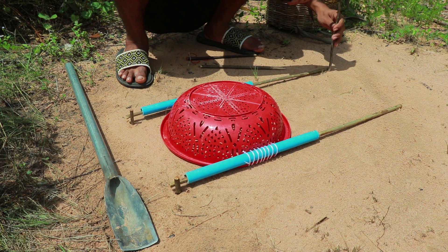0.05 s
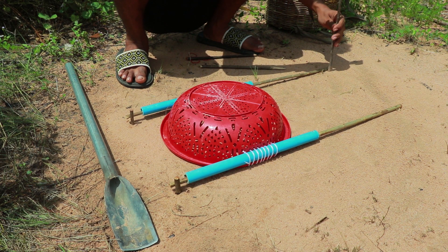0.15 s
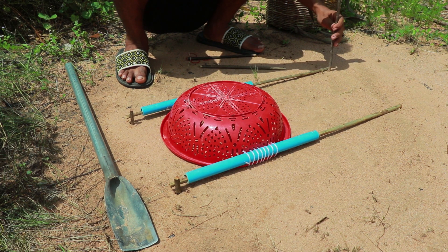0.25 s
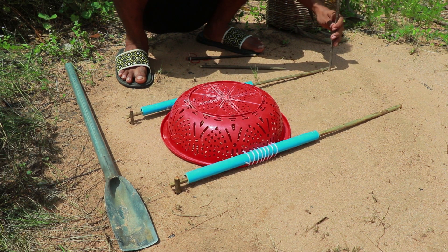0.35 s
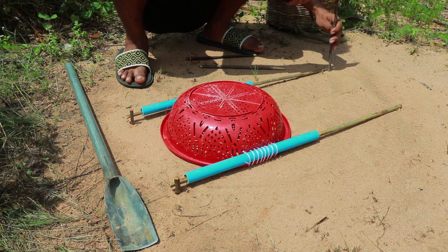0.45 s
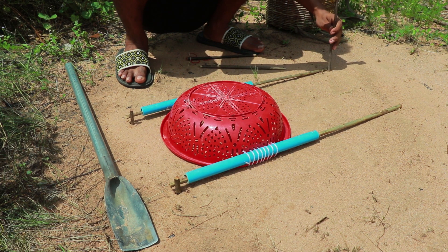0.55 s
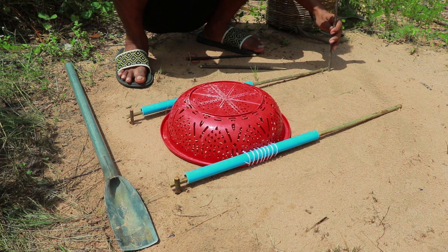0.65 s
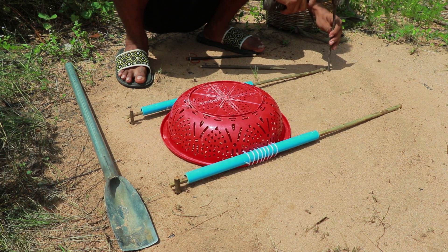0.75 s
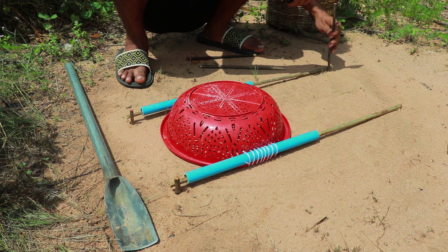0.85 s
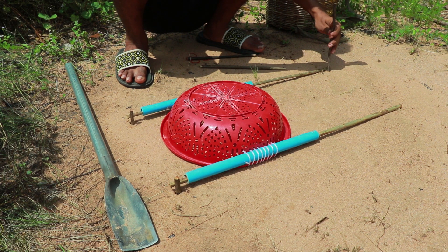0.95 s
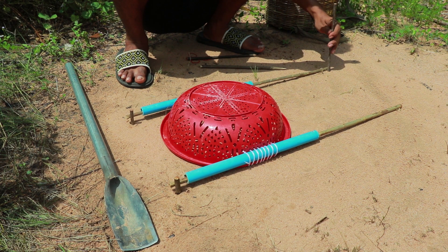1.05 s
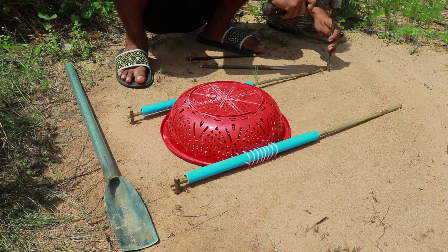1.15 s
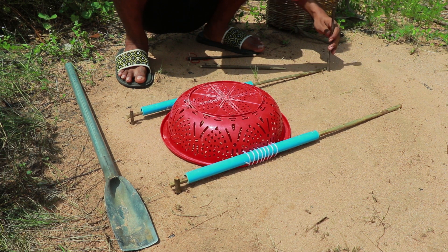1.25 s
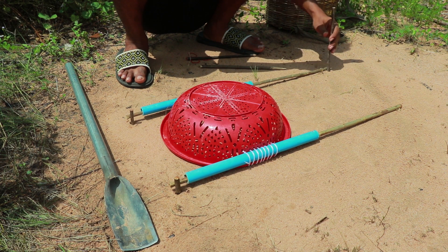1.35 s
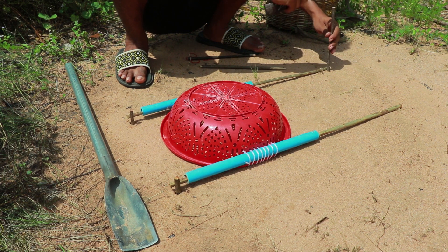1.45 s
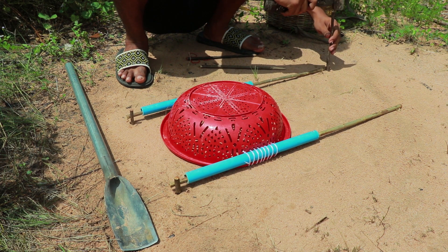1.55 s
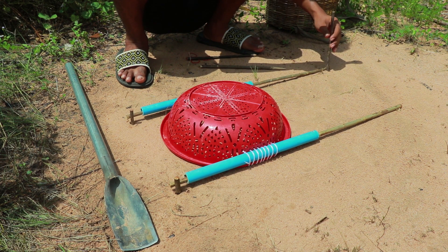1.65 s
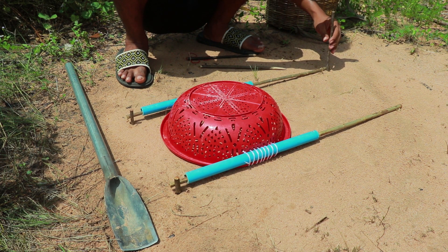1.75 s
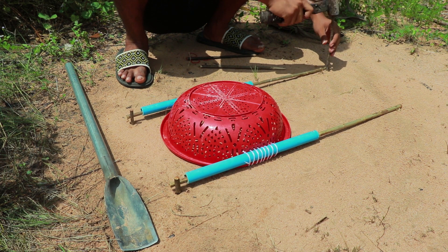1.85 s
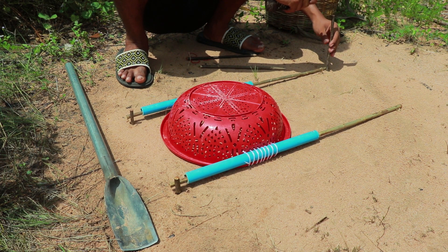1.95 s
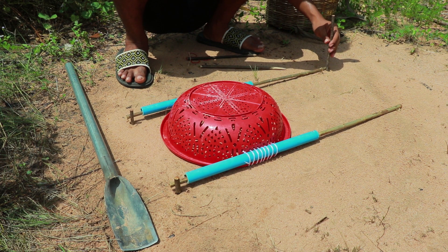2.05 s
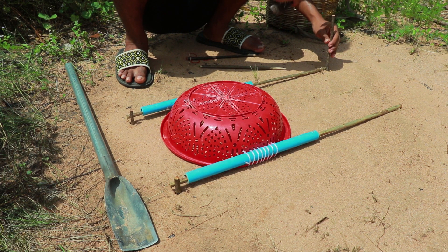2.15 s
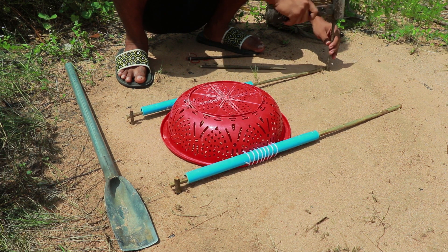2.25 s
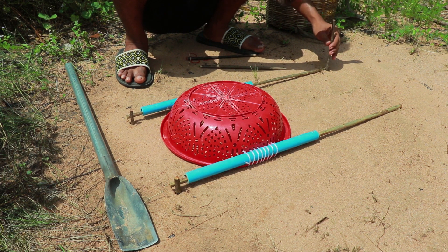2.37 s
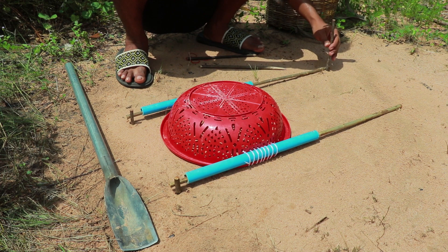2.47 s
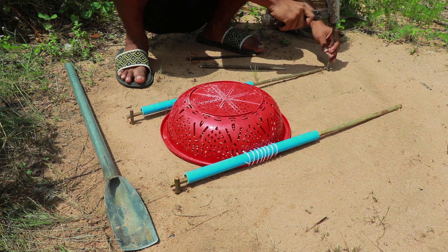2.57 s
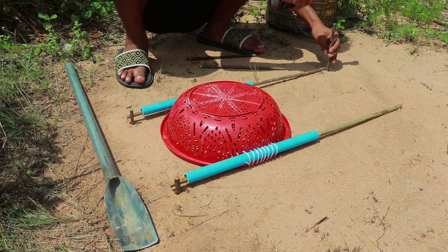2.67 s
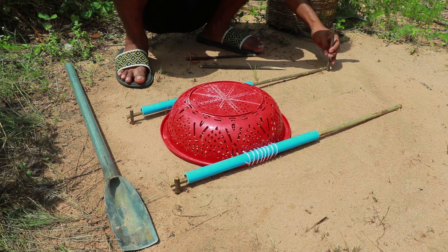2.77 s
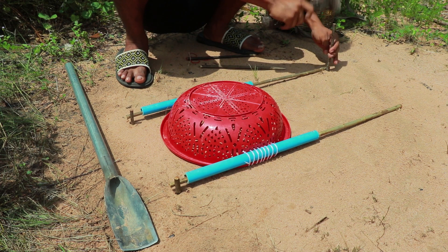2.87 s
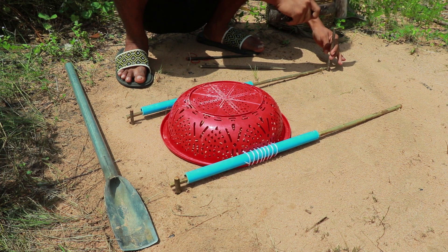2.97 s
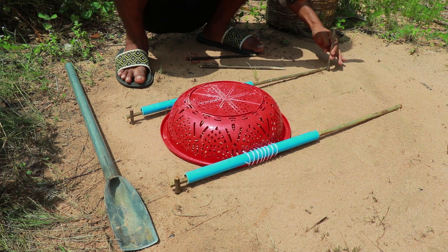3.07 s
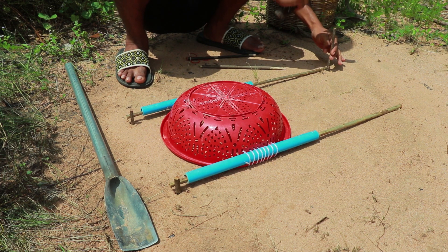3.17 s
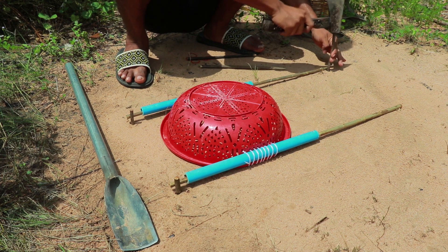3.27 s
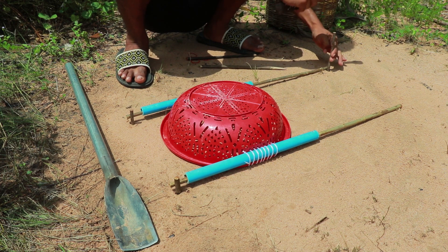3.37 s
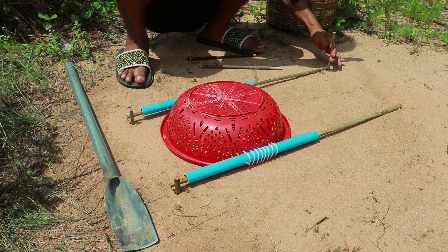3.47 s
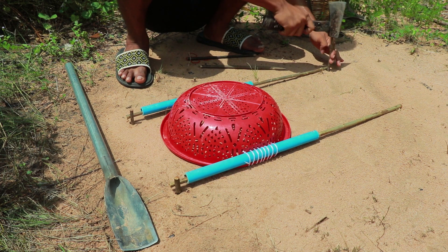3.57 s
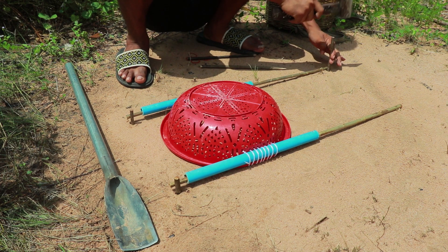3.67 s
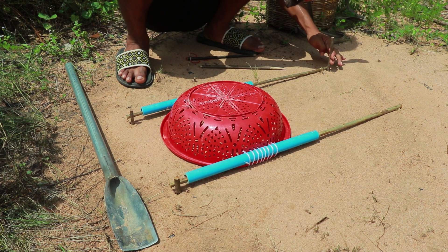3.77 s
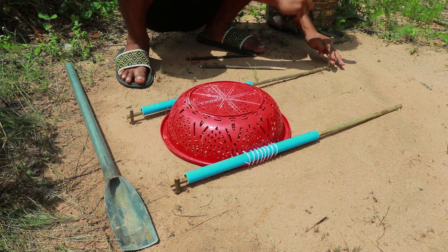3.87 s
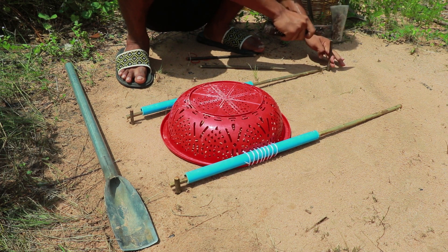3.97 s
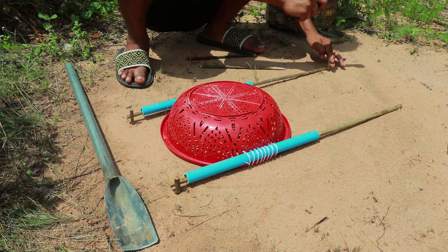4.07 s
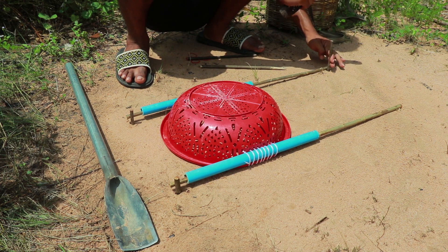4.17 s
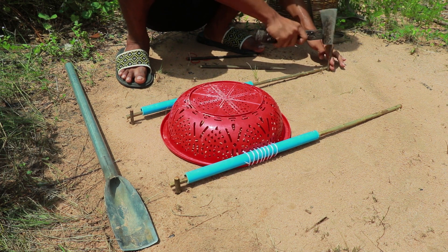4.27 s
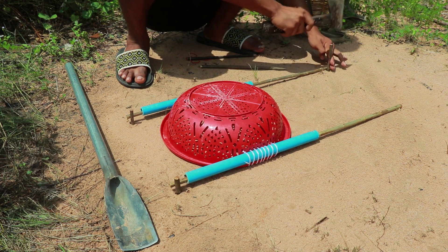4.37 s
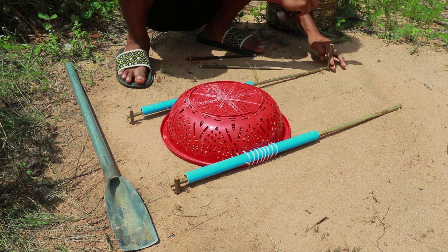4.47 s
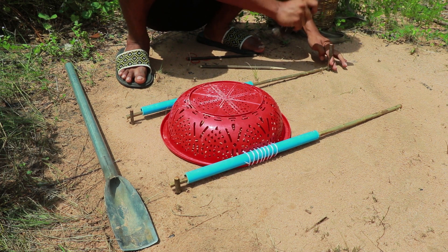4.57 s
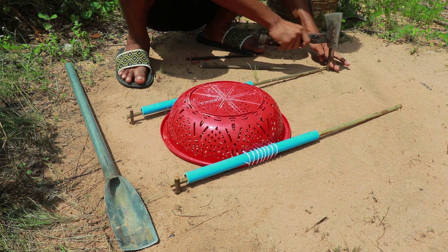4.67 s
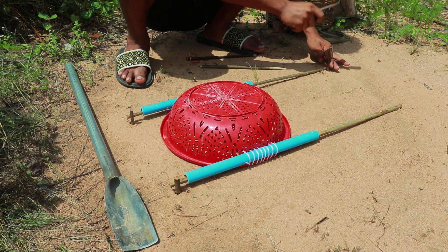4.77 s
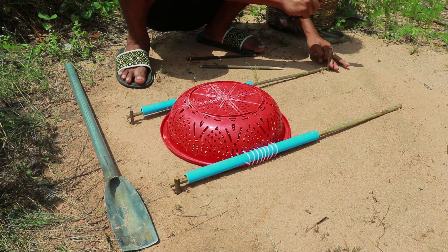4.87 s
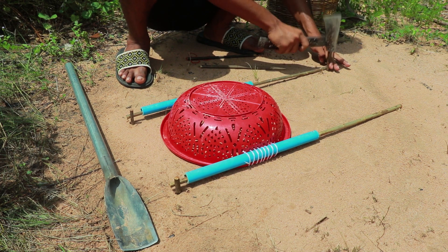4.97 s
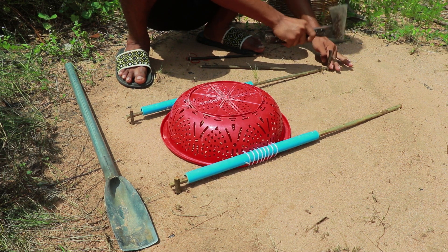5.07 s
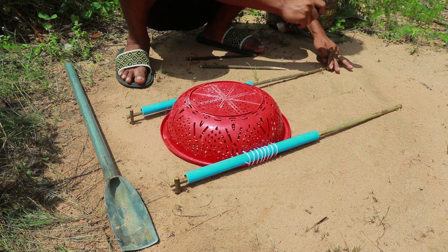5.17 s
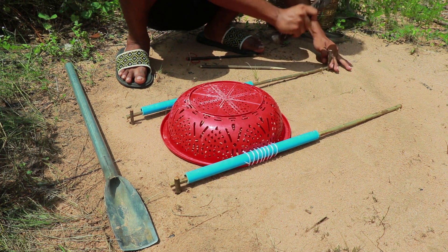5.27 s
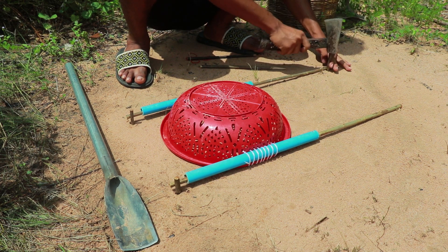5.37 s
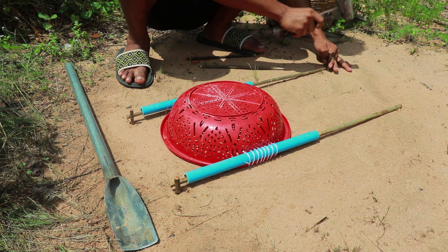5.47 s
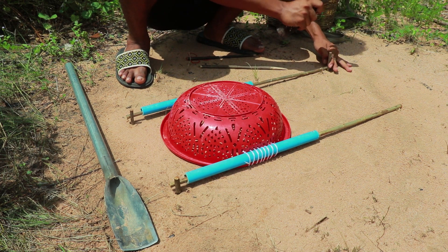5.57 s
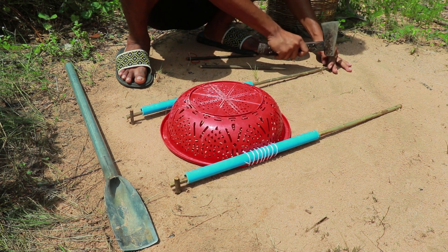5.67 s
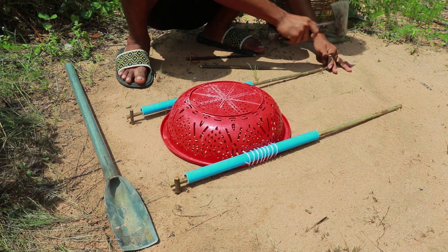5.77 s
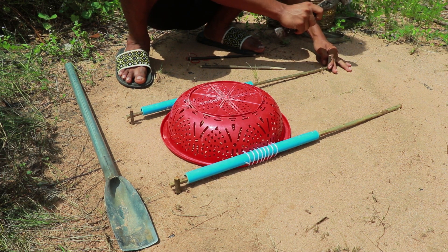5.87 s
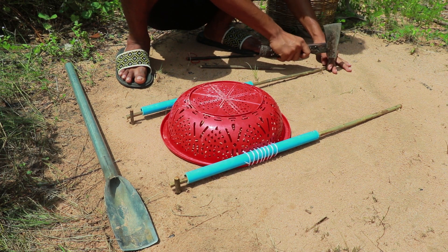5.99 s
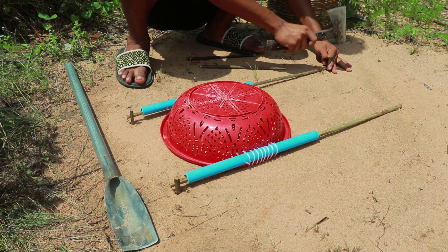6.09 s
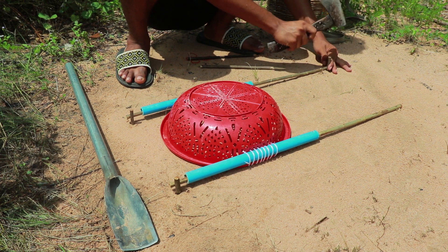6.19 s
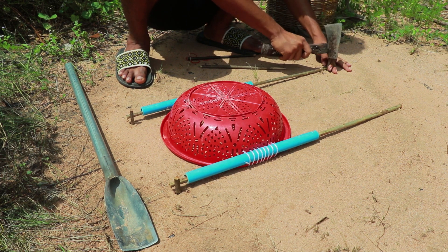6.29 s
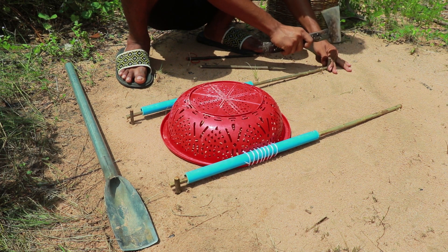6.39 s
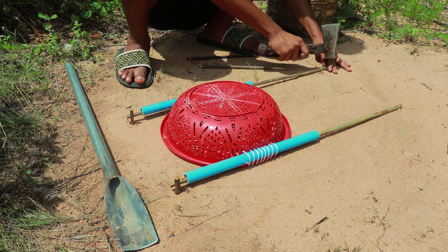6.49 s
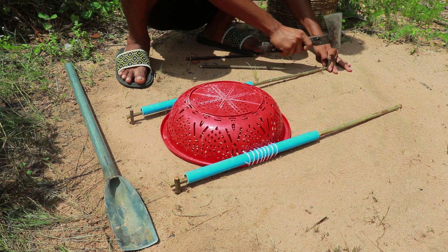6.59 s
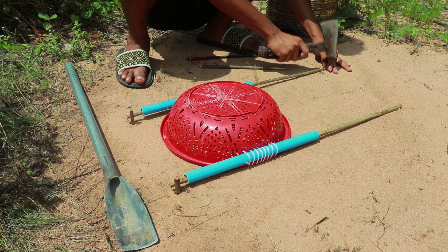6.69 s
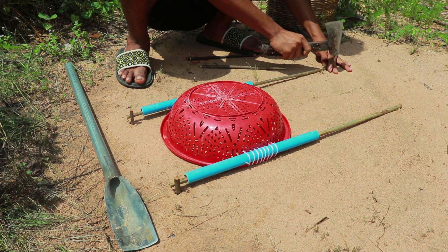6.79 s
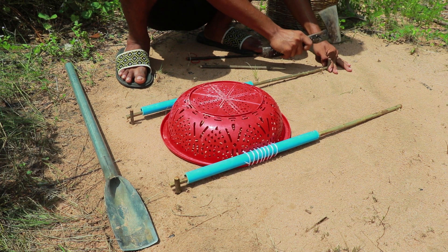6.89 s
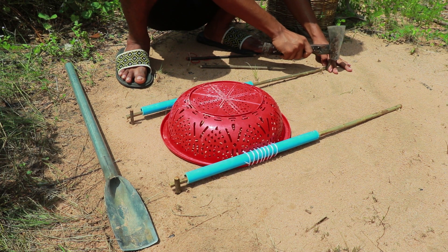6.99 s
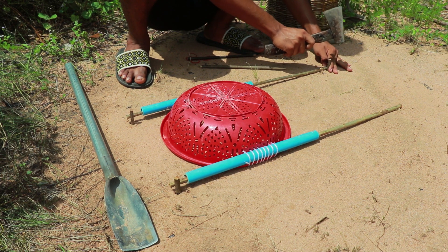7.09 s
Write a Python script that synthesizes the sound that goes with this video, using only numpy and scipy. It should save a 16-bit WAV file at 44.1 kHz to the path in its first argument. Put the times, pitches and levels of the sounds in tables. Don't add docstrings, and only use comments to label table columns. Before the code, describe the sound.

Open air over sandy ground, heard close in stereo, dry, with a quiet hiss, faint high insect bands and soft low puffs of wind. A hatchet held flat hits a thin wooden stake, stronger on the right. From 0.1 s come modest taps about every 0.37 s, brightening until about 1.6 s. Around 1.9 to 2.3 s the cracks are loudest, steely and almost overloaded. Firm, even blows follow at about 0.35 s spacing until 6 s, gradually less metallic, the soil thud and rumble fuller. Each is a very short chatter with a clipped ring, a fading hiss of shaken grains and a low thump just after; some have a tiny bounce click. From 6.35 to 7.03 s four lighter taps come quicker, about 0.22 s apart, with a brief hollow hum near 480 Hz. Faint husky chirps and short falling whistles from far birds are scattered throughout.

```python
import sys
import numpy as np
from scipy import signal
from scipy.fft import rfft, irfft
from scipy.io import wavfile
from scipy.ndimage import uniform_filter1d

SR = 44100
rng = np.random.default_rng(int(sys.argv[2]) if len(sys.argv) > 2 else 0)


def waveform_to_disk(signal):
    frames = np.transpose(np.atleast_2d(signal))
    scaled = np.clip(frames, -1, 1) * 32767
    samples = np.round(scaled).astype(np.int16)
    wavfile.write(sys.argv[1], SR, samples)


def decibels_to_gain(level_db):
    exponent = np.asarray(level_db, float) / 20
    return 10 ** exponent


N = 314874

# contact_s, stake_db, blade_db, sand_db, thud_db
HATCHET_BLOWS = [(0.1001, -31, -16.5, -24, -43), (0.4828, -27, -18, -24.5, -29), (.841, -25, -15, -22, -20),
                 (1.209, -23.5, -13.5, -19, -23), (1.568, -16.5, -11.5, -17.5, -26),
                 (1.933, -14, -4, -18.5, -20), (2.293, -14, -0.5, -18.5, -20), (2.643, -15, -9, -19.5, -24),
                 (2.9758, -13, -9, -19.5, -19), (3.323, -16.5, -10, -19.5, -20),
                 (3.659, -14.5, -13, -21.5, -17), (4.0154, -15.5, -12, -22.5, -19.5),
                 (4.362, -14.5, -9.5, -22, -15.5), (4.717, -15, -14.5, -21, -17.5),
                 (5.0678, -12, -12, -20.5, -18), (5.421, -14, -15.5, -22, -19),
                 (5.7471, -12, -15.5, -22, -20), (6.0674, -16.5, -13, -23.5, -20.5),
                 (6.3482, -19.5, -24, -27.5, -22), (6.577, -17.5, -23.5, -29, -18.5),
                 (6.796, -22.5, -28.5, -29, -20.5), (7.027, -22.5, -31.5, -28.5, -19.5)]


def unit(x):
    return x / np.sqrt(np.mean(x ** 2))


def colour(x, points):
    hz, db = np.transpose(points)
    f = np.fft.rfftfreq(x.shape[-1], 1 / SR) + 1
    gain = decibels_to_gain(np.interp(np.log(f), np.log(hz), db))
    return unit(irfft(rfft(x) * gain, x.shape[-1]))


def ring(push, modes, scatter_db, detune, rise_cycles=1.0):
    t = np.arange(len(push)) / SR
    out = 0
    for (hz, db, t60), (a, b) in zip(modes, rng.standard_normal((len(modes), 2))):
        swing = 1000. ** (-t / t60) * (1 - np.exp(-t * hz / rise_cycles))
        tone = np.sin(2 * np.pi * hz * (1 + detune * b) * t)
        y = signal.fftconvolve(push, tone * swing)[:len(push)]
        out = out + decibels_to_gain(db + scatter_db * a) * y / np.abs(y).max()
    return out


def add(out, s, sound, pan_db):
    i = max(int(s * SR), 0)
    n = min(sound.shape[-1], N - i)
    out[:, i:i + n] += sound[..., :n] * decibels_to_gain(np.array([[pan_db], [-pan_db]]) / 2)


def sunk(first, last, k):
    return first + (last - first) * k / (len(HATCHET_BLOWS) - 1)


def stir_db(s, sand_db):
    grip_s, loose_db = 0.3, -22.5
    return loose_db * np.exp(-s / grip_s) + 0.9 * (sand_db + 21.5)


def air():
    # pitch_hz, level_db (per Hz)
    hiss_points = [(12, -57), (20, -8), (86, -7), (146, -10.5), (262, -11.5), (337, -13), (422, -12),
                   (459, -14), (642, -18.5), (1120, -19), (1760, -22.5), (2990, -24.5), (3250, -27),
                   (9400, -27.5), (16000, -36)]
    # pitch_hz, level_db
    housing_dip = [(4000, 1.2), (4750, -3), (5200, -0.8)]
    insect_points = [(5150, -35.5), (5400, -30), (5650, -42.5), (6900, -30.5), (7350, -13.0),
                     (7800, -34.0), (8200, -59.0)]
    noise = rng.standard_normal((5, N))
    shared = signal.sosfilt(signal.butter(1, 900, fs=SR, output="sos"), noise[2])
    swell = unit(uniform_filter1d(rng.standard_normal(N), SR // 3))
    hiss = colour(colour(noise[:2] + 0.47 * shared, hiss_points), housing_dip)
    return hiss * decibels_to_gain(-51 + 0.55 * swell) + decibels_to_gain(-75.5) * colour(noise[3:], insect_points)


def gusts():
    # peak_s, level_db
    puff_events = [(.39, -44), (.77, -38), (2.46, -42.5), (2.8, -39), (3.1, -45), (3.42, -46), (3.93, -52),
                   (4.13, -46), (4.55, -39.5), (4.89, -40), (5.18, -61), (5.55, -48), (5.92, -44),
                   (6.48, -53.5), (6.95, -41)]
    puff_hz, puff_s, boom_hz, boom_t60_s, breeze_db = 82, 0.038, 91.9, 0.88, -59
    t = np.arange(N) / SR
    wander = 1 + 0.1867 * unit(uniform_filter1d(rng.standard_normal(N), SR // 30))
    puffs = sum(decibels_to_gain(db) * np.exp(-((t - s) / puff_s) ** 2) for s, db in puff_events)
    shake = np.full(N, decibels_to_gain(breeze_db))
    for k, (s, _, _, sand_db, _) in enumerate(HATCHET_BLOWS):
        boom_db = sunk(-50, -40, k) + stir_db(s, sand_db)
        shake += decibels_to_gain(boom_db) * (t > s) * 1000. ** (-np.abs(t - s) / boom_t60_s)
    shake = uniform_filter1d(shake, SR // 40)
    boom = puffs * np.sin(2 * np.pi * np.cumsum(puff_hz * wander) / SR)
    boom = boom + shake * np.sin(2 * np.pi * np.cumsum(boom_hz * wander) / SR)
    return boom * decibels_to_gain(-6.0 + np.array([[-2.], [2.]]))


def bird_call(length, start_hz, end_hz, db, husk_hz):
    n = int(1.33 * length * SR)
    k = max(int(SR / husk_hz / 1.9), 1)
    husk = rng.standard_normal((2, 2, 9000))
    husk = uniform_filter1d(uniform_filter1d(husk, k), k)[..., :n]
    phase = 2 * np.pi * np.cumsum(np.linspace(start_hz, end_hz, n)) / SR
    call = husk[0] * np.sin(phase) + husk[1] * np.cos(phase)
    swell = np.sin(np.pi * (np.arange(n) / n) ** .7)
    return decibels_to_gain(db - 1) * unit(call) * swell


def birds():
    # start_s, length_s, pitch_hz, level_db
    husky_chirps = [(0, .04, 2930, -50.5), (.245, 0.023, 3760, -58), (.251, 0.07, 2960, -58),
                    (.573, 0.081, 1690, -55), (.723, 0.05, 2900, -54), (2.101, 0.068, 2990, -51.5),
                    (3.861, .07, 2860, -49), (3.867, 0.036, 1720, -53), (4.25, 0.032, 2910, -52.5),
                    (4.494, 0.041, 2890, -53.5), (6.72, 0.053, 2900, -58), (6.904, 0.062, 2495, -51.5)]
    # start_s, length_s, pitch_hz, level_db
    clear_chirps = [
        (0, 0.028, 2050, -52),
        (.377, 0.048, 3000, -56),
        (.572, 0.091, 2950, -56),
        (.985, 0.053, 2790, -52),
        (1.314, .058, 2050, -55),
        (2.13, 0.052, 2060, -52),
        (3.689, .058, 2080, -51),
        (5.392, 0.034, 2250, -53),
        (6.424, 0.05, 1645, -61),
        (6.539, 0.057, 3020, -50),
    ]
    # start_s, length_s, start_hz, end_hz, level_db
    whistles = [
        (0, 0.087, 3310, 3130, -56),
        (.15, .09, 3400, 3270, -55),
        (.545, 0.02, 3500, 2750, -53),
        (2.79, .025, 3700, 3200, -59),
        (5.01, 0.05, 4600, 2707, -58),
        (5.563, .05, 4600, 2610, -58),
        (6.4, 0.054, 2540, 2500, -57),
        (6.651, 0.054, 2560, 2540, -57),
        (6.885, .044, 4400, 2680, -60),
    ]
    out = np.zeros((2, N))
    for chirps, husk_hz in ((husky_chirps, 580), (clear_chirps, 200)):
        for s, length, hz, db in chirps:
            add(out, s, bird_call(length, hz, hz * 0.98, db, husk_hz), pan_db=0)
    for s, length, start_hz, end_hz, db in whistles:
        add(out, s, bird_call(length, start_hz, end_hz, db, husk_hz=70), pan_db=0)
    return out


def soil(deep_db, rumble_db):
    # pitch_hz, level_db, t60_s
    soil_modes = [(94.6, -7.5, 0.14), (118.8, 2.5, 0.074)]
    # pitch_hz, level_db (per Hz)
    rumble_points = [(60, -50.5), (110, -3), (230, 7.5), (400, 3), (560, -5), (900, -49)]
    t = np.arange(8192) / SR
    shove = np.exp(-((t - .006) / .002) ** 2)
    deep = ring(shove, soil_modes, scatter_db=1.5, detune=.03)
    rumble = colour(rng.standard_normal(len(t)), rumble_points)
    rumble = rumble * 1000. ** (-t / 0.27) * np.clip(t / 0.018, 0, 1) ** 2
    return decibels_to_gain(deep_db) * deep + decibels_to_gain(rumble_db) * rumble


def thud(db, hz, cycles=0.58):
    t = np.arange(882) / SR - 0.01
    return decibels_to_gain(db) * np.cos(2 * np.pi * hz * t) * np.exp(-(t * hz / cycles) ** 2)


def sand(db):
    # pitch_hz, level_db (per Hz)
    grain_points = [(290, 5), (500, -1), (919, -11.5), (1060, -9.5), (2570, -9.5), (3020, -8), (4940, -6.5),
                    (5470, -5.5), (9360, 0.5), (16000, -16.5)]
    # pitch_hz, level_db
    trickle_points = [(2500, -2.5), (3500, 2), (5000, -4.5), (7000, -7.5), (9500, -2.1), (12000, -6.5)]
    clump_s, clump_db, trickle_t60_s, trickle_db = 0.0018, 3, 0.25, -12
    t = np.arange(8192) / SR
    grains = rng.standard_normal((2, len(t))) * decibels_to_gain(1.5 * rng.exponential(size=len(t)))
    grains = np.array([grains[0], .7 * grains[0] + .7 * grains[1]])
    clumps = unit(uniform_filter1d(rng.standard_normal(len(t)), int(clump_s * SR)))
    hiss = colour(grains * decibels_to_gain(clump_db * clumps), grain_points)
    t60 = np.clip(0.1 + 0.0044 * (db + 19), .06, .15)
    trickle = decibels_to_gain(trickle_db) * colour(hiss, trickle_points) * 1000. ** (-t / trickle_t60_s)
    fading = hiss * 1000. ** (-t / t60) + trickle
    return decibels_to_gain(db) * fading * np.minimum(t / 0.0036, 1)


def strike(wood_db, steel_db, contact_s, ringing):
    # pitch_hz, level_db, t60_s
    wood_groups = [
        [(1165, 0.00081, 0.012)],
        [(734, 0.67, 0.01)],
        [(1709, 0.012, 0.011)],
        [(2274, -1.1, 0.011)],
        [(3167, 0.0039, 0.0047)],
    ]
    # pitch_hz, level_db, t60_s
    steel_groups = [
        [(3654, 5.5, 0.0054), (4080, -4.5, 0.0087)],
        [(4688, 0.59, 0.039)],
        [(4600, -8, 0.024), (5560, 5, 0.0048), (5930, 8, 0.0069), (6780, 4, 0.013)],
        [(7840, 0.5, 0.0029), (8860, 9.4, 0.004), (9327, 2.5, 0.014), (9852, 1.2, 0.013)],
        [(11300, 5.5, 0.016), (11740, 7.5, 0.0042), (13320, -5, 0.012), (15050, -2, .007)],
    ]
    slap_s, slap_db = 0.0024, -9.5
    t = np.arange(3000) / SR
    slap = decibels_to_gain(slap_db) * np.exp(-((t - slap_s) / contact_s * 3) ** 2)
    chatter = 0.28 * rng.standard_normal(len(t)) * (np.exp(-(t / contact_s) ** 2) + slap)
    chatter[0] += 2
    stake = sum(decibels_to_gain(db) * ring(chatter, modes, scatter_db=1., detune=.004)
                for modes, db in zip(wood_groups, wood_db))
    blade = 0
    for modes, db in zip(steel_groups, steel_db):
        held = [(hz, mode_db, t60 * ringing) for hz, mode_db, t60 in modes]
        blade = blade + decibels_to_gain(db) * ring(chatter, held, scatter_db=1., detune=.004)
    sound = stake * decibels_to_gain([[3], [-3]]) + blade
    return signal.sosfilt(signal.butter(3, 560, "high", fs=SR, output="sos"), sound)


def hums(out):
    # start_s, level_db
    hum_events = [
        (6.349, -30.5),
        (6.578, -35.5),
        (6.796, -35),
        (7.027, -33),
    ]
    # pitch_hz, level_db, t60_s
    hum_modes = [(478.6, 0.17, 0.093)]
    push = np.exp(-np.arange(6000) / 20.)
    for s, db in hum_events:
        hum = ring(push, hum_modes, scatter_db=3.5, detune=0, rise_cycles=1.5)
        add(out, s, decibels_to_gain(db) * hum, pan_db=0.0)


def bounces(out):
    # contact_s, stake_db, long_ring_db, edge_db, thud_db
    bounce_events = [(0.861, -35, -50, -31, -28), (1.235, -40, -50, -30.5, -32),
                     (2.3183, -33, -59, -27, -33), (3.0051, -35, -44.5, -41, -48.5),
                     (4.745, -34.5, -34, -39, -25.5), (4.9697, -47.5, -80, -77.5, -52.5),
                     (5.0953, -35, -60, -51, -24), (5.1094, -36.5, -56, -65, -46),
                     (5.457, -30, -37, -31.5, -22.5), (5.771, -29, -42, -56, -23),
                     (5.7835, -35, -57.5, -64, -25), (6.101, -26.5, -35.5, -43, -25),
                     (6.8189, -27.5, -35, -39.5, -21), (7.0538, -30, -38, -46, -21.5)]
    for s, stake_db, long_db, edge_db, thud_db in bounce_events:
        wood_db = stake_db + np.array([-1.5, -5.5, -0.5, -9.5, -2])
        steel_db = [stake_db - 11, long_db, edge_db - 3, edge_db - 1.2, edge_db - 6]
        add(out, s + 0.00044, strike(wood_db, steel_db, contact_s=0.00056, ringing=0.88), pan_db=-8.5)
        add(out, s + 0.00343 - 0.01, thud(thud_db, hz=292), pan_db=0.0)


def blows(out):
    # shaft_db, second_bend_db, head_db (re stake), long_ring_db, edge_db (re blade)
    landings = [(-16, 9.5, -3.5, -8, -5), (-7.5, 8.5, -6.5, -8.5, -1.3), (-5, 7, 11.5, -31, -4),
                (-18, 6, -3, -16, 0), (-10.5, 1.4, -3.5, -10, -1), (-15.5, -1.5, -16, -20.5, -4.5),
                (-14.5, -0.5, 5.5, -15.5, -4), (-17, -2.5, 4.5, -12.5, -6.5), (-5, -1.5, 3, -5, -1.5),
                (-1, -4, 9.5, -13.5, 0.5), (-6, 0.7, 9, -24, -1.5), (-5, 6, 0.5, -11.5, -3),
                (-14, 1, -36, -7.5, -6), (-4.5, 0.5, -27, -0.2, -4), (-7, -0.5, -13.3, -17, 0.5),
                (-6.5, -1.5, 4, -1.5, -1), (-9, -2.5, -1, -5, 1.5), (-6, 3, 6, -17.5, -2.5),
                (-6.5, 5.5, 8, -6.5, 4), (-8.5, 1, -2.5, -4, -1), (-7, 4.5, 3.7, 6.5, 10.5),
                (-2.5, 5.5, 11.5, 4, 14)]
    for k, (blow, landing) in enumerate(zip(HATCHET_BLOWS, landings)):
        s, stake_db, blade_db, sand_db, thud_db = blow
        shaft, bend, head, long, edge = landing
        third_bend, upper, top = -6, sunk(-4.5, -19.5, k), sunk(-5.5, -10, k)
        wood_db = stake_db + 3 + np.array([0, shaft, bend, third_bend, head])
        steel_db = blade_db + 3 + np.array([0, long, upper, edge, top + edge / 2])
        contact_s = sunk(1.7, 0.79, k) / 1000
        ringing = sunk(0.69, 0.88, k)
        add(out, s, strike(wood_db, steel_db, contact_s, ringing), pan_db=sunk(-11, -6, k))
        add(out, s, sand(sand_db), pan_db=-3.)
        stir = stir_db(s, sand_db)
        add(out, s, soil(sunk(-38, -23, k) + stir, sunk(-41, -25, k) + stir), pan_db=-3.5)
        arrives = s + sunk(14.1, 8.94, k) / 1000 - 0.01
        add(out, arrives, thud(thud_db, sunk(226.4, 246, k)), pan_db=0.0)
        echo = thud(thud_db + sunk(-9.5, -22.5, k), sunk(250, 213, k))
        add(out, arrives + sunk(16.65, 12.74, k) / 1000, echo, pan_db=-1.0)


def hammering():
    port_lag_s = 5.5e-5
    out = np.zeros((2, N))
    blows(out)
    bounces(out)
    hums(out)
    out = signal.sosfilt(signal.butter(2, 70, "high", fs=SR, output="sos"), out)
    padded = N + 126
    lag = np.exp(-2j * np.pi * np.fft.rfftfreq(padded, 1 / SR) * port_lag_s)
    left = irfft(rfft(out[0], padded) * lag, padded)[:N]
    return np.array([left, out[1]])


def scene():
    return air() + gusts() + birds() + hammering()


def top_cut(x):
    return signal.sosfilt(signal.butter(12, 15800, fs=SR, output="sos"), x)


def record(dry):
    band = signal.sosfilt(signal.butter(2, 45, "high", fs=SR, output="sos"), dry)
    band = signal.sosfilt(signal.cheby1(6, .5, 15600, fs=SR, output="sos"), band)
    return top_cut(np.clip(band, -1, 1))


dry = scene()
out = record(dry)
waveform_to_disk(out)
```